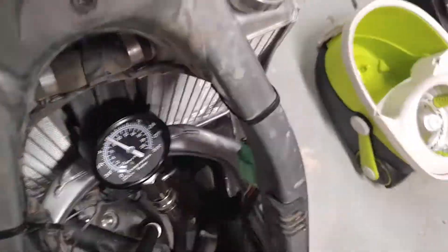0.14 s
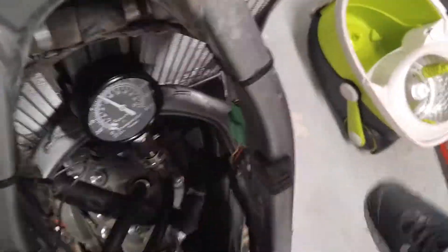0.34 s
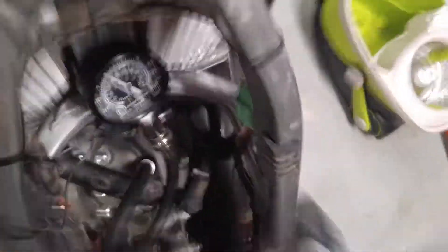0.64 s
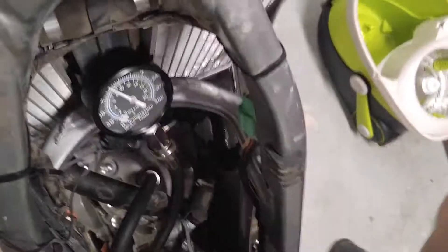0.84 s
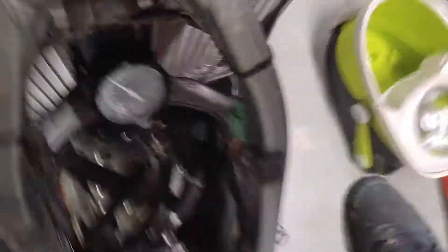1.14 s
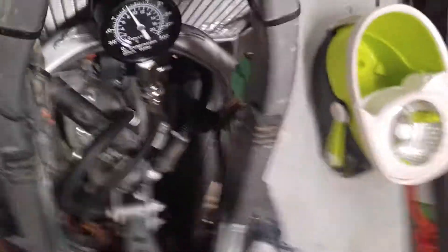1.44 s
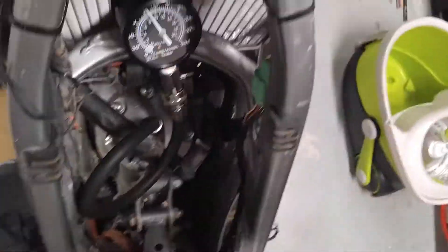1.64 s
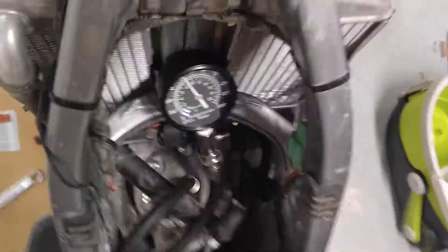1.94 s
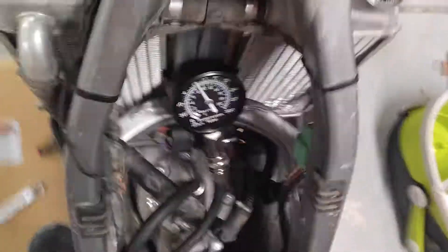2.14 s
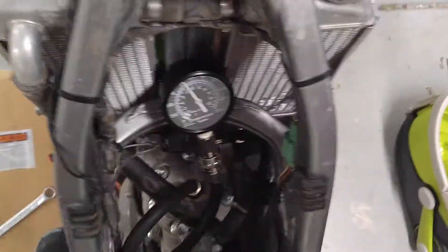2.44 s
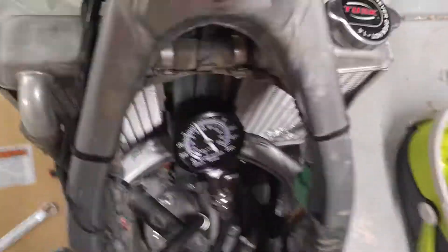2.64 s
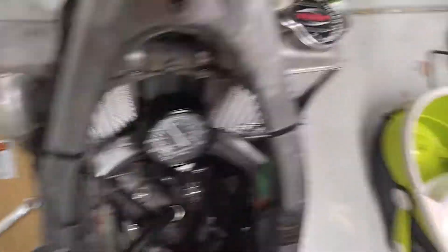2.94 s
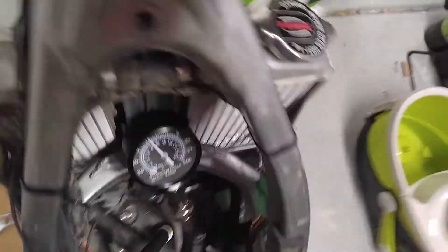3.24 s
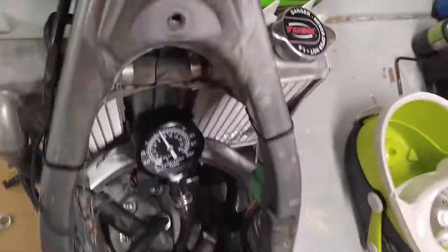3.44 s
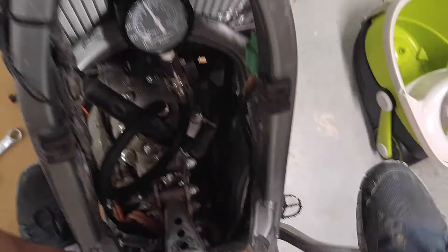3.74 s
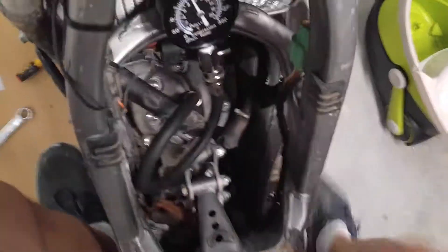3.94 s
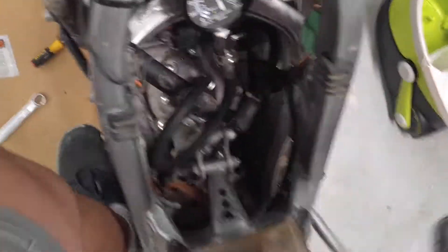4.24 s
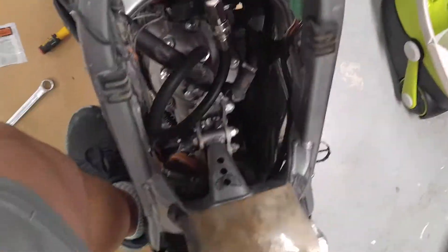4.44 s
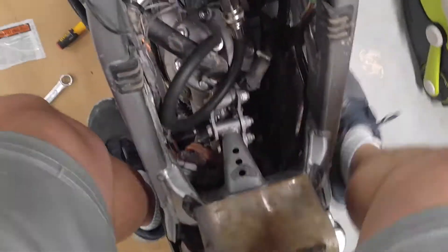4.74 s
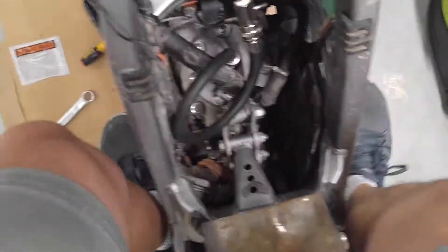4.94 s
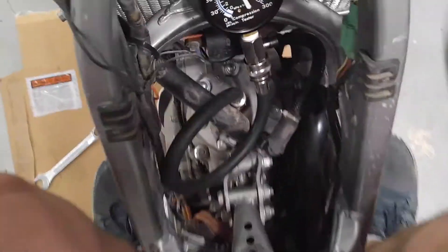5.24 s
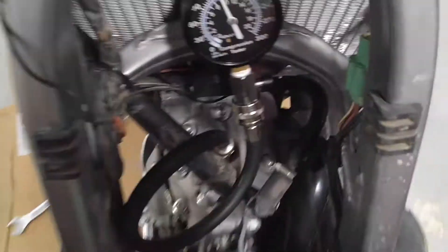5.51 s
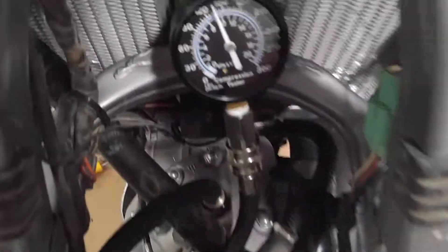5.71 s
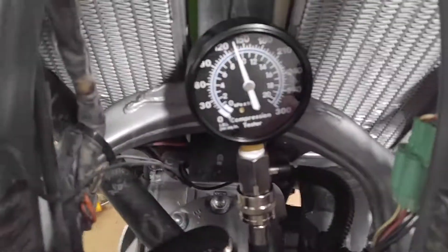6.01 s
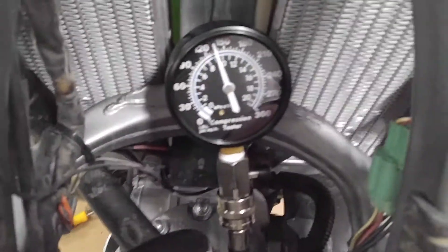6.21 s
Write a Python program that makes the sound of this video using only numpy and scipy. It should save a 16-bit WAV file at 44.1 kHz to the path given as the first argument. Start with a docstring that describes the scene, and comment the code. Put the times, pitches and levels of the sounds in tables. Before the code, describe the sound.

Close by in a garage, seven kick-starter strokes grind, chuff hollowly and clank, the engine never catching, before the rider steps off with squeaking soles.

```python
"""In a garage, a small two-stroke engine is kicked over seven times and never fires, heard from close by.
Each opening of the exhaust port excites the modes of pipe and silencer; the lever's pawl bites, the gears
whirr as noise ticks, and the lever clanks on its stop as short chatter through damped metal modes.
Then the rider steps off: shoes scuff (gated noise) and squeak (wavering tones) on concrete over a faint
mains hum and low room air, with a diffuse reverberant tail behind the engine and shoes."""
import sys
import numpy as np
from scipy import signal
from scipy.fft import rfft, irfft
from scipy.io import wavfile
from scipy.ndimage import uniform_filter1d, minimum_filter1d

SR = 44100
rng = np.random.default_rng(int(sys.argv[2]) if len(sys.argv) > 2 else 0)


def unload_audio(sound):
    """Save the sound as a 16-bit wav file, at the path given as the first command line argument."""
    columns = np.transpose(np.atleast_2d(sound))
    # keep every value between -1 and 1, then stretch to whole-number steps
    steps = np.round(np.clip(columns, -1, 1) * 32767)
    wavfile.write(sys.argv[1], SR, steps.astype(np.int16))


def volts_from_db(level):
    """Convert decibel levels to linear amplitude ratios."""
    exponent = np.asarray(level, float) / 20
    return 10 ** exponent


N = 280917
T = np.arange(N) / SR


def shape(x, points):
    """Minimum-phase filtering: a causal response through (f/Hz, gain/dB) points, from the folded cepstrum."""
    hz, db = np.transpose(points)
    size = 4096
    grid_hz = np.arange(size // 2 + 1) * SR / size
    gain = volts_from_db(np.interp(np.log(grid_hz + 1), np.log(hz), db))
    cepstrum = irfft(np.log(gain))
    cepstrum[1:size // 2] *= 2
    cepstrum[size // 2 + 1:] = 0
    response = irfft(np.exp(rfft(cepstrum)))
    return signal.fftconvolve(np.atleast_2d(x), response[None], axes=1)[:, :x.shape[-1]]


def band(x, lo_hz, hi_hz):
    """Band-pass filtering by a Butterworth section cascade."""
    sos = signal.butter(3, [lo_hz, min(hi_hz, .49 * SR)], "band", fs=SR, output="sos")
    return signal.sosfilt(sos, x)


def unit(x):
    """Normalization to unit rms."""
    return x / np.sqrt(np.mean(x ** 2))


def ring(modes, seconds=.5):
    """Modal superposition: the impulse response is a sum of exponentially decaying sines."""
    t = np.arange(int(seconds * SR)) / SR
    return sum(volts_from_db(db) * np.sin(2 * np.pi * hz * t) * 1000 ** (-t / t60) for hz, db, t60 in modes)


def add(out, s, x, db):
    """Linear superposition: mix x in at s seconds with its peak at db."""
    i = int(max(s, 0) * SR)
    out[i:i + len(x)] += (volts_from_db(db) * x / np.abs(x).max())[:N - i]


def walk(rate):
    """Slow random modulation: levels held 1 / rate s, slewed by two moving averages, at unit rms."""
    k = int(SR / rate)
    held = np.repeat(rng.standard_normal(N // k + 1), k)
    return unit(uniform_filter1d(uniform_filter1d(held, k), k)[:N])


# spectrum of the still air: f/Hz, relative density/dB
AIR_SPECTRUM = [(15, -28), (25, -19), (48, 2.5), (123, -12.5), (343, -29), (498, -53), (600, -40.5),
                (780, -67), (1320, -120)]


def room_air():
    """Stationary random noise: two independent channels share one spectrum."""
    return volts_from_db(-58) * unit(shape(rng.standard_normal((2, N)), AIR_SPECTRUM))


# partials of the mains hum: f/Hz, mean rms level/dB
HUM = [(59.2, -57.5), (118.4, -70), (231.5, -78), (312.2, -89)]


def mains_hum():
    """Additive synthesis: steady partials under one slow amplitude modulation."""
    hum = sum(np.sqrt(2) * volts_from_db(db) * np.sin(2 * np.pi * hz * T) for hz, db in HUM)
    return hum * volts_from_db(1.5 * walk(19))


# reverberation of the garage: f/Hz, t60/s, relative level/dB
GARAGE = [(100, 0.49, -6.5), (300, 0.98, -7), (694, 0.89, -4.5), (1500, 1, -9), (3500, 0.82, -5.5),
          (8100, 0.53, -14), (14000, 0.22, -14.5)]


def garage(x):
    """Diffuse reverberation: noise decays at its own rate in each half octave, independently for mid and side."""
    hz, t60, db = np.transpose(GARAGE)
    t = np.arange(int(1.3 * SR)) / SR
    rise = np.clip((t - .006) / .015, 0, 1)
    tail = 0
    for f in 60 * 2 ** np.arange(0, 8.1, .5):
        decay_s = np.interp(np.log(f), np.log(hz), t60)
        fade = rise * 1000 ** (-t / decay_s)
        part = band(rng.standard_normal((2, len(t))), f / 2 ** .25, f * 2 ** .25)
        level = volts_from_db(np.interp(np.log(f), np.log(hz), db))
        tail = tail + part * fade / np.sqrt(np.sum(fade ** 2)) * level
    return signal.fftconvolve(x[None], tail, axes=1)[:, :N]


# rubber sole squeaks: start t/s, end t/s, mean f/Hz, level/dB, second partial f/Hz, its level/dB
SQUEAKS = [(4.63, 4.83, 2210, -45, 2650, -52), (5.0, 5.06, 1650, -42, 3300, -46)]


def squeaks():
    """Stick-slip oscillation: two partials waver in pitch and level as they swell and fade."""
    out = np.zeros(N)
    drift = np.cumsum(1 + .006 * walk(120)) / SR  # unevenly running time, s
    flutter = volts_from_db(3 * walk(50))
    for t0, t1, hz, db, hz2, db2 in SQUEAKS:
        swell = np.sin(np.pi * np.clip((T - t0) / (t1 - t0), 0, 1) ** 0.48)
        first = volts_from_db(db) * np.sin(2 * np.pi * hz * drift)
        second = volts_from_db(db2) * np.sin(2 * np.pi * hz2 * drift)
        out += swell * flutter * (first + second)
    return out


# soft bumps of feet and plastic: t/s, peak level/dB, f/Hz, t60/s
BUMPS = [(4.421, -33, 137, 0.66), (4.820, -21.5, 737, 0.025), (4.845, -42, 760, 0.25),
         (5.066, -24.5, 276, 0.012), (5.479, -47, 343, 0.026), (6.299, -52, 330, 0.031),
         (6.299, -47, 5500, .015), (6.321, -48, 327, 0.022), (6.323, -53, 5500, .015),
         (6.35, -42.5, 331, 0.039)]


def bumps():
    """Forced resonance: a smooth 8 ms push excites one hollow mode and another 1.6 times higher."""
    out = np.zeros(N)
    t = np.arange(int(.008 * SR)) / SR
    for s, db, hz, t60 in BUMPS:
        push = np.hanning(len(t)) * np.sin(2 * np.pi * hz * t)
        hollow = ring([(hz, 0, t60), (hz * 1.6, -4, t60)])
        add(out, s, signal.fftconvolve(push, hollow), db)
    return out


# clothes and soles shifting all along: t/s, whirr level/dB, rumble level/dB, hiss level/dB
SHIFTING = [(0, -38, -31, -42.5), (1.15, -45, -59, -47), (1.31, -49, -63, -58), (1.9, -44.5, -66, -48.5),
            (2.5, -43.5, -51, -54.5), (3.2, -39, -44, -38), (3.8, -45.5, -61, -47.5),
            (4.55, -40, -36.5, -50), (4.68, -52, -65, -49), (4.81, -49.5, -50, -58),
            (5.04, -46.5, -71, -43), (5.38, -46.5, -51.5, -52), (5.47, -48.5, -65, -55.5),
            (5.6, -51.5, -60, -66), (5.83, -64.5, -79, -69.5), (6.2, -64.5, -72.5, -70),
            (6.37, -51.5, -61, -57.5)]
# down-strokes of the lever: start t/s, grind level/dB, jangle level/dB after the stop, coasting level/dB
STROKES = [(-0.05, 4, -5, -9), (0.6, -1.5, -5, 2), (1.33, 0.5, -4, -3), (1.935, -1, -2, 3),
           (2.61, 1.5, -7, -4.5), (3.24, 9.5, 3, 4), (3.86, 4.5, 3, -2.5)]
# the lever clanks on its stop, ending each stroke: t/s, level/dB, contact scale/ms (held within 1 to 20)
STOPS = [(0.1038, -1.5, 13), (0.752, -3.5, 15.5), (1.4946, -10, 10), (2.1184, -6.5, 21), (2.7701, -5, 13),
         (3.3858, -2.5, 18), (4.04, -7.6, 12)]
# answers to a stroke, columns rumble, whirr, hiss: level/dB relative to the stroke, or t60/s
GRIND_FROM_DB = (-41, -39, -42.5)
GRIND_TO_DB = (-17, -40, -39)
JANGLE_DB = (-31, -17, -15)
JANGLE_T60_S = (.12, 0.2, 0.2)
COAST_DB = (-26, -29.5, -35)
COAST_T60_S = (0.78, 0.83, 1.25)
# soles drag on concrete: t/s, whirr level/dB, rumble and hiss relative level/dB, t60/s, foot lifts after t/s
SCUFFS = [(2.54, -41.5, -12, 6, .4, 0.068), (5.068, -33, -30, -0.5, 0.64, 0.36),
          (5.6, -52.5, 1.5, -11, 2.5, 0.084), (6.035, -57, -7, -3.5, 0.68, .06)]


def column(values):
    """Broadcasting of one value per layer over time."""
    return np.array(values, float)[:, None]


def fade_from(s, t60):
    """Exponential decay from s on, silent before."""
    return (T >= s) * 1000. ** (-np.maximum(T - s, 0) / t60)


def rub_levels():
    """Friction under load: gains of rumble, whirr and hiss follow the stroke, then decay after the stop."""
    s, whirr, rumble, hiss = np.transpose(SHIFTING)
    out = np.array([volts_from_db(np.interp(T, s, c)) for c in (rumble, whirr, hiss)])
    grind_from, grind_to = column(GRIND_FROM_DB), column(GRIND_TO_DB)
    for (start, grind_db, jangle_db, coast_db), (stop, _, _) in zip(STROKES, STOPS):
        way = (T - start) / (stop - start)
        down = (way >= 0) & (way < 1)
        out[:, down] += volts_from_db(grind_db + grind_from + (grind_to - grind_from) * way[down])
        out += volts_from_db(jangle_db + column(JANGLE_DB)) * fade_from(stop, column(JANGLE_T60_S))
        out += volts_from_db(coast_db + column(COAST_DB)) * fade_from(stop, column(COAST_T60_S))
    for s, db, rumble_db, hiss_db, t60, slide in SCUFFS:
        # 4.2 ms ramps as the sole lands and lifts
        on_floor = np.clip(np.minimum(T - s, s + slide - T) / 0.0042, 0, 1)
        out += volts_from_db(db + column([rumble_db, 0, hiss_db])) * fade_from(s, t60) * on_floor
    return out


# spectrum of rubbing: f/Hz, relative density/dB
RUB_COLOUR = [(290, -35), (500, -27), (750, 0), (1510, 1.5), (2130, 8.5), (3340, -4.5), (3920, -12.5),
              (4940, -13), (7310, -11), (14200, -25), (16000, -23)]
# modes of the frame: f/Hz, relative level/dB, t60/s (f is nominal: each blow detunes it)
FRAME = [(710, -16, 0.02), (727, -1, 0.092), (816, 10, 0.027), (953, -0.5, 0.037), (1033, -10, 0.1),
         (300, -6, 0.078)]
# modes of the silencer shell: f/Hz, relative level/dB, t60/s
SILENCER = [(504, -7.5, 0.047), (639, -2, 0.051), (666, -2, 0.061), (760, 1.5, 0.034), (898, -4.5, 0.028),
            (1060, -4, 0.051), (1504, 2.5, 0.012), (1700, -4.5, 0.022), (1808, -2, 0.027),
            (2376, -39.5, 0.0082)]


def rubbing():
    """Friction noise: dense uneven ticks of teeth and grit ring frame and silencer below, broad noise above."""
    rumble, whirr, hiss = rub_levels()
    # a new random strength every 90 samples
    strength = np.minimum(rng.exponential(1, (2, N // 90 + 1)), 3).repeat(90, axis=1)[:, :N]
    ticks = rng.standard_normal((2, N)) * volts_from_db(3 * strength)
    ticks *= volts_from_db(2.0 * walk(24.84))
    broad = shape(ticks, RUB_COLOUR)
    rung = signal.fftconvolve(ticks, ring(FRAME + SILENCER, 0.15)[None], axes=1)[:, :N]
    low = rumble * unit(band(rung, 450, 1230))
    middle = whirr * unit(band(broad, 1175, 3520))
    high = hiss * unit(band(broad, 3544, 16500))
    return low + middle + high


# the pawl bites as the foot lands: t/s, level/dB, contact scale/ms
BITES = [(0.5935, -8.5, 7.9), (1.3134, -18.5, 9), (1.3239, 0.5, 6.6), (1.927, -17, 8.7), (2.605, -9.5, 12),
         (3.2301, -13, 8), (3.247, -2.5, 10), (3.8501, -22, 8)]
# the gears chatter as they take the load of compression: t/s, level/dB, contact scale/ms (held within 1 to 20)
LOADS = [(0.68, -13, 15), (1.37, -20, 12), (2.052, -9, 24), (2.6444, -13.5, 6.5), (2.669, -10.5, 22),
         (3.277, -15, 11), (3.96, -8.5, 12)]
# returning lever, loose parts, shoes: t/s, crack level/dB, knock and fizz relative level/dB, contact scale/ms
TICKS = [(0.024, -26, -4, -11, 9), (0.3561, -34, 0, 3, 12), (0.3835, -25.5, 3.5, 2.5, 8),
         (0.5364, -31, 5, 0, 6), (0.9374, -21.5, 3, -22, 6.5), (0.9852, -32.5, 15, -2, 5),
         (1.0591, -28.5, -21, -5, 13), (1.0794, -38, 20.5, -14, 6), (1.1363, -35, 3, -16, 6.5),
         (1.2324, -40, 6, -11, 6.5), (1.4417, -15, 3, -1, 6), (1.7005, -27, 4, -6, 19),
         (1.7653, -20.5, -2.5, -3, 8.5), (1.8302, -26, 4, -3, 8), (2.309, -22, -22, -3, 13),
         (2.4174, -26, 5, 1, 4.5), (2.5027, -29.5, 9, -17, 4.8), (3.0071, -31, -5, -19, 9),
         (3.02, -26, 4, 0, 8.3), (3.0501, -24.5, 4, -3, 6.5), (3.1102, -22.5, -12, -2, 6.3),
         (3.6651, -30, -3, -20, 5), (3.7044, -45.5, 26, -12, 6), (3.7562, -21, -8, -2.5, 7.6),
         (4.3261, -22, -0.5, 0.5, 9), (4.369, -25, -6, 2, 19), (4.3909, -17.5, 1.5, 2.5, 9.3),
         (4.455, -24, -9, 3, 9.6), (4.4642, -15, -3.5, 1.5, 6.4), (4.8854, -43, 9, 6.5, 5),
         (4.901, -40.5, 0, -4, 5), (4.9167, -34.5, -15, 0, 6.5), (5.0608, -31, 11, -3.5, 4),
         (5.3198, -33, -13, -24, 7), (5.4784, -23, -2.5, -1, 7), (5.718, -61, 1, -10, 3),
         (5.735, -52, 3, -14.5, 3), (5.7744, -60, 17, -9.5, 7), (5.798, -61, 9, -12, 5),
         (5.98, -58, -6, 13, 12), (6.0352, -54.5, -3.5, -2.5, 9), (6.153, -55, -10, -3, 4),
         (6.197, -54, -3, -11, 5), (6.2277, -53, -17, -7, 6.5), (6.2637, -58, -12, -7, 5),
         (6.3008, -47, -5, 1, 5), (6.322, -46, -22, -5, 4), (6.3544, -42, -3.5, -8, 11)]
# make-up of each kind of blow: crack, knock, clang, fizz relative level/dB, attack/ms
BITE_MIX = (-8, 1, -0.5, -28.5, .5)
LOAD_MIX = (-13, -1, -4.5, -28, 12.5)
STOP_MIX = (-0.5, -25.5, -2, -3.5, .5)


def contacts():
    """Impact inventory: t/s, crack, knock, clang, fizz level/dB, contact scale/ms, attack/ms of each blow."""
    rows = []
    for table, mix in ((BITES, BITE_MIX), (LOADS, LOAD_MIX), (STOPS, STOP_MIX)):
        for s, db, ms in table:
            rows.append((s, *(db + np.array(mix[:-1])), ms, mix[-1]))
    for s, db, knock, fizz, ms in TICKS:
        rows.append((s, db, db + knock, db - 1.5, db + fizz, ms, .5))
    return rows


# modes of the lever: nominal f/Hz (each blow detunes it), relative level/dB, t60/s
LEVER = [(1430, -2, .008), (1750, 0, .012), (2280, -2, .008), (3150, 0, .008), (4500, 0, .01),
         (5960, -2, .012)]


def blows():
    """Impact excitation: a short chatter cracks broadly and is tinted by damped modes of frame and lever."""
    out = np.zeros(N)
    t = np.arange(2000) / SR
    rows = contacts()
    detune = np.exp(.03 * rng.standard_normal((len(rows), len(LEVER))))
    noises = rng.standard_normal((len(rows), 2000))
    for row, noise, ratios in zip(rows, noises, detune):
        s, crack_db, knock_db, clang_db, fizz_db, ms, attack_ms = row
        u = np.maximum(t - attack_ms / 1000, 0) / (np.clip(ms, 1, 20) / 1000)
        attack = np.minimum(t / (attack_ms / 1000), 1)
        contact = attack * (np.exp(-u ** 2) + 0.39 * np.exp(-t / 0.049))  # loose parts rattle on
        tones = rfft(noise * contact)
        # flatten the burst's spectrum so the chatter sounds evenly broad
        chatter = irfft(tones / np.abs(tones) ** .7) * np.sqrt(contact)
        lever = ring([(hz * k, g, t60) for (hz, g, t60), k in zip(LEVER, ratios)], 0.052)
        frame = ring([(hz * k, g, t60) for (hz, g, t60), k in zip(FRAME, ratios)], .2)
        metal = unit(chatter) + .4 * unit(signal.fftconvolve(chatter, lever)[:len(t)])
        fizz = band(chatter, 6500, 11500) + .5 * band(chatter, 11500, 16500)
        add(out, s, signal.fftconvolve(chatter, frame), knock_db)
        add(out, s, band(metal, 1180, 2530), clang_db)
        add(out, s, band(metal, 2500, 6500), crack_db)
        add(out, s, fizz, fizz_db)
    return out


# exhaust puffs, one list per kick, gaps mostly widening as the crank slows: t/s (sounding 3 ms later), level/dB
PUFFS = [
    [(0.004, -5), (0.064, 8), (0.137, -4), (0.264, -14), (0.305, -14.5)],
    [(0.645, -4), (0.713, 2.5), (0.793, -7.5), (0.909, -22.5), (1.073, -39)],
    [(1.337, -11.5), (1.395, 2.5), (1.473, 0.5), (1.558, -7), (1.669, -11)],
    [(1.993, -10), (2.078, 4), (2.157, -18), (2.276, -12)],
    [(2.622, -8), (2.697, 4.5), (2.779, 2.8), (2.899, -8.5)],
    [(3.308, -4), (3.357, 5), (3.443, -4), (3.586, -9), (3.638, -17.5)],
    [(3.907, -10.5), (3.987, 3), (4.065, 4), (4.265, -13.5), (4.534, -35)],
]
# modes of the exhaust pipe, the first three for the thud: f/Hz, relative level/dB, t60/s
PIPE = [(45.2, -13, 0.16), (123, -29.5, 0.088), (157.4, -1.5, 0.092), (239.5, 2.5, 0.051),
        (272.6, -5, 0.17), (312.2, -2.5, 0.3), (339.5, -4.5, 0.2)]
# a fast crank gives rasp, a slow one more thud: gap since the last puff t/s, thud, rasp relative level/dB
BY_GAP = [(.065, -21, -4), (0.081, -29.5, -6.5), (.12, -5.5, -13), (0.199, -6.5, -11.5)]


def exhaust():
    """Pulse-excited resonance: a pressure dip at the port rings the pipe, and gas noise rings the silencer."""
    out = np.zeros(N)
    t = np.arange(400) / SR
    dip = -np.exp(-((t - .0015) / 0.00044) ** 2)
    thud = signal.fftconvolve(dip, ring(PIPE[:3]))
    boom = signal.fftconvolve(dip, ring(PIPE[3:]))
    shell = ring(SILENCER, 0.34)
    lag = np.arange(2000) / SR
    gas_envelope = np.exp(-lag / 0.013) * np.minimum(lag / 0.0079, 1)
    gaps, thuds, rasps = np.transpose(BY_GAP)
    for kick in PUFFS:
        since = np.diff(np.transpose(kick)[0])
        # the first turn starts from rest
        thud_db = [-3, *np.interp(since, gaps, thuds)]
        rasp_db = [-10, *np.interp(since, gaps, rasps)]
        gas = rng.standard_normal((len(kick), 2000)) * gas_envelope
        for (s, db), low_db, hiss_db, g in zip(kick, thud_db, rasp_db, gas):
            s = s + 0.00296  # each puff sounds 3 ms after its listed time
            add(out, s, thud, db + low_db)
            add(out, s, boom, db)
            # the gas reaches the silencer about 2 ms later
            add(out, s + 0.002044, signal.fftconvolve(g, shell), db + hiss_db)
    return out


# filter on the side signal: f/Hz, gain/dB
WIDE = [(60, -16), (110, -39), (200, -24), (380, -21.5), (700, -16), (1290, -11.5), (2380, -15), (4400, -5),
        (8120, -5.5), (15000, -6.5)]
# left minus right: f/Hz, level difference/dB
LEAN = [(60, 0), (110, 1.5), (200, -0.5), (380, 1), (700, 2), (1290, 5), (2380, 2.5), (4400, 1.5),
        (8120, 1), (15000, 0.0)]


def scene():
    """Mid-side stereophony: direct, diffuse and background sound summed, then spread to left and right."""
    near = exhaust() + blows() + bumps() + squeaks()
    hum, air = mains_hum(), room_air()
    rub = rubbing()
    diffuse = garage(near + .5 * rub[0]) + 0.89 * rub
    mid = near + hum + air[0] + diffuse[0]
    # the direct sound enters the side 9 samples late
    direct_side = 0.18 * np.roll(band(near, 510, 16500), 9)
    side = shape(2.1 * diffuse[1] + direct_side, WIDE)[0] + .6 * air[1]
    left = shape(mid + side, [(hz, db / 2) for hz, db in LEAN])[0]
    right = shape(mid - side, [(hz, -db / 2) for hz, db in LEAN])[0]
    return np.array([left, right])


def low_pass(x):
    """Removes everything above the highest recorded frequency."""
    return signal.sosfilt(signal.butter(12, 16810, fs=SR, output="sos"), x)


# overall tone colour, with a steep top end: f/Hz, gain/dB
TONE_COLOUR = [(20, -27.5), (80, -5.5), (380, 2.5), (480, -8), (580, -1), (8500, -0.5), (9000, -6.5),
               (9600, 1), (10200, 0.5), (13000, -1), (16500, -7), (16900, -44.5)]


def record(dry):
    """Linear filtering and peak limiting: one tone colour for all, then a look-ahead limiter holds the peaks."""
    x = shape(dry, TONE_COLOUR)
    gain = np.minimum(1, .88 / (np.abs(x).max(axis=0) + 1e-9))
    # 441 samples: 10 ms windows
    gain = uniform_filter1d(minimum_filter1d(gain, size=441), size=441)
    return low_pass(x * gain)


dry = scene()
out = record(dry)
unload_audio(out)
```